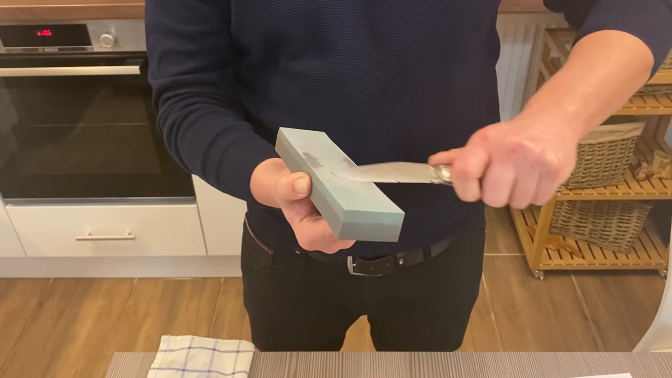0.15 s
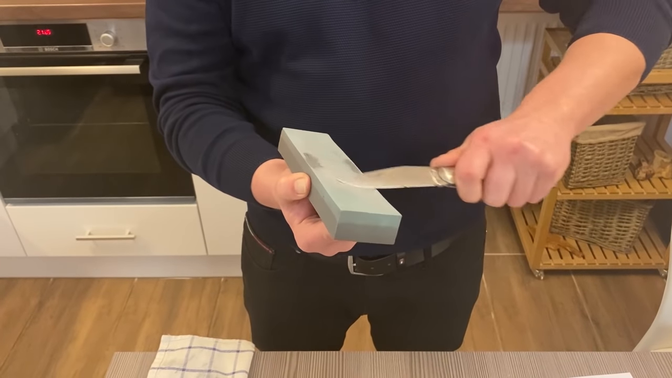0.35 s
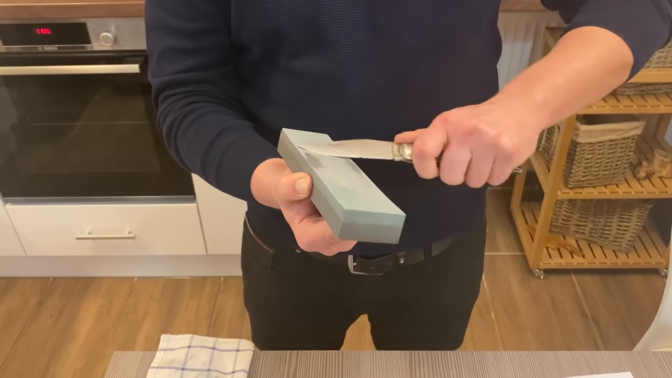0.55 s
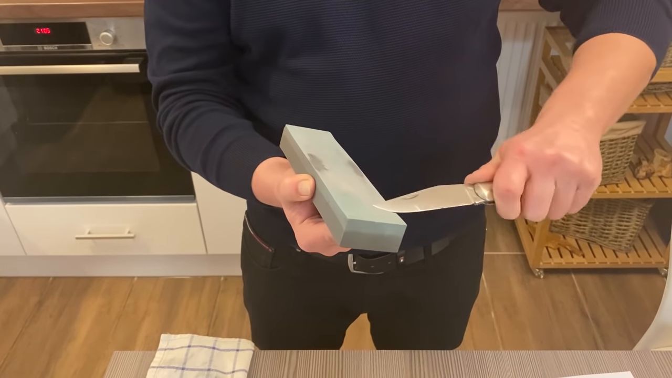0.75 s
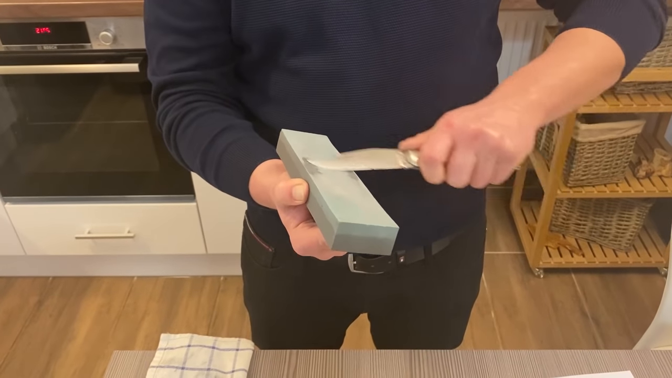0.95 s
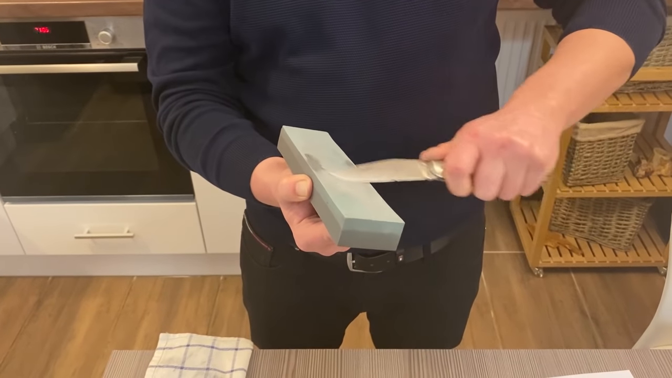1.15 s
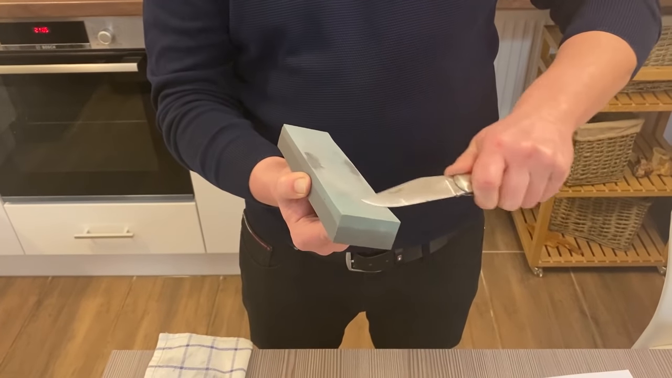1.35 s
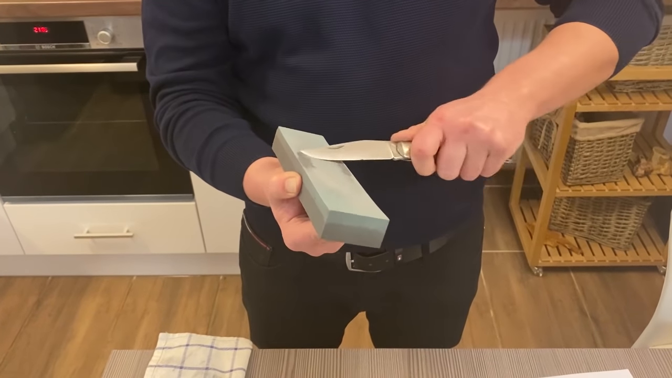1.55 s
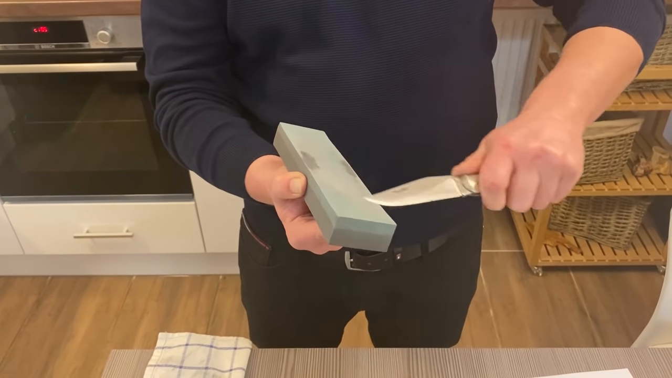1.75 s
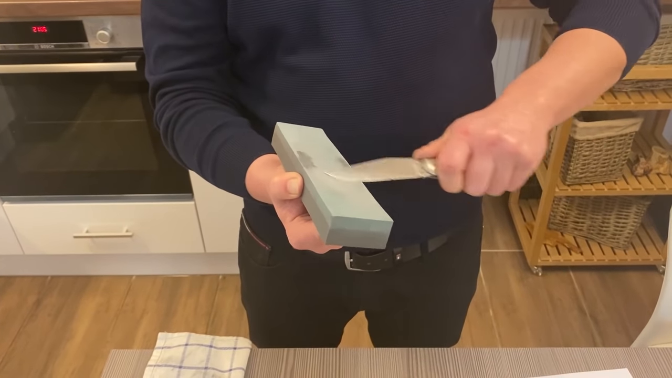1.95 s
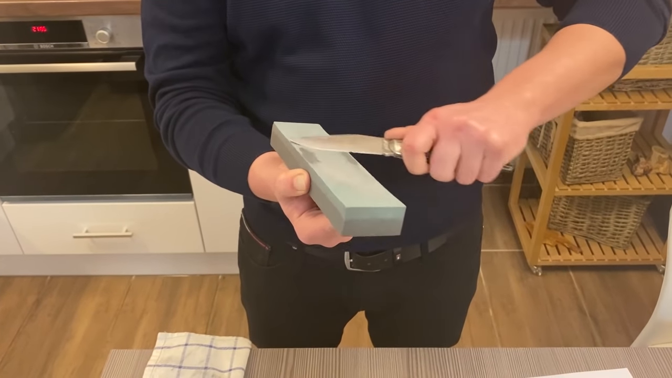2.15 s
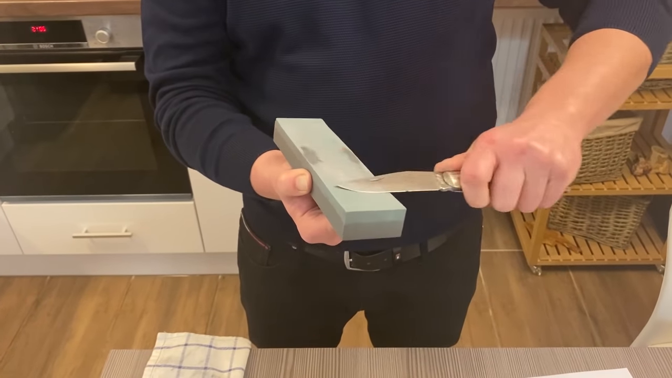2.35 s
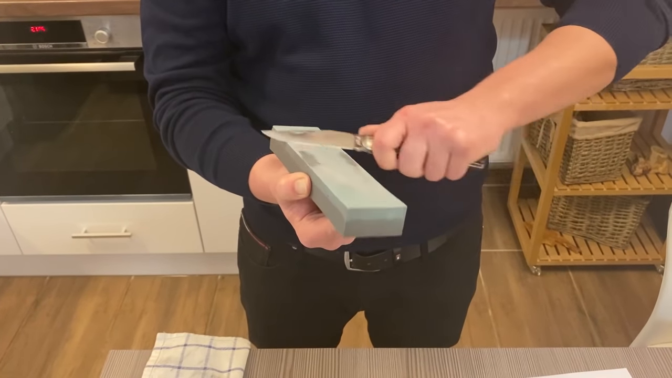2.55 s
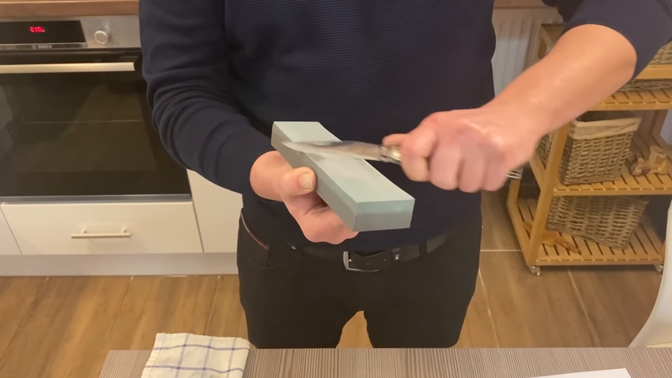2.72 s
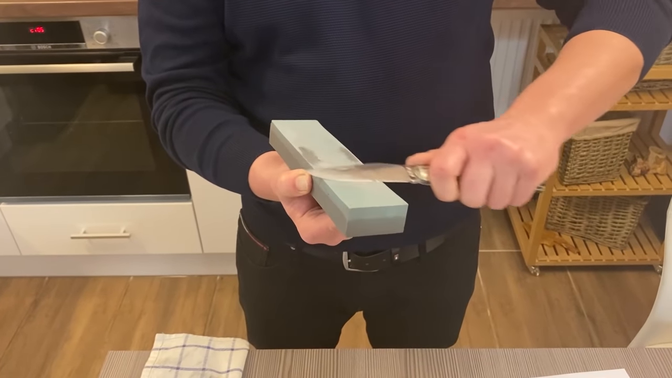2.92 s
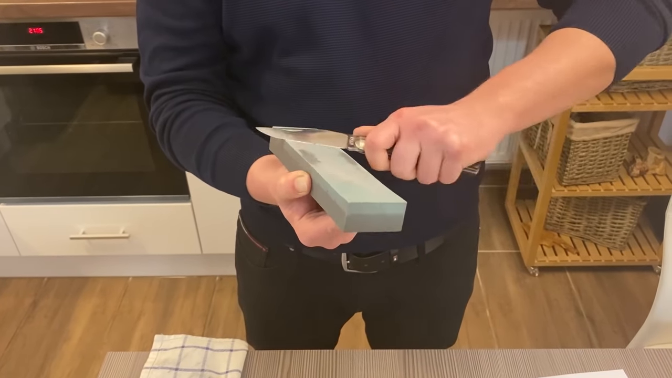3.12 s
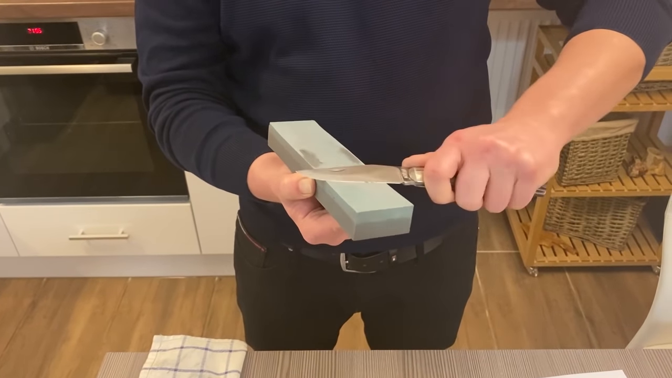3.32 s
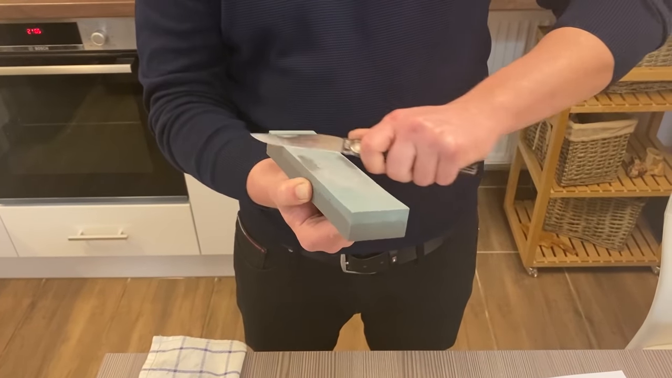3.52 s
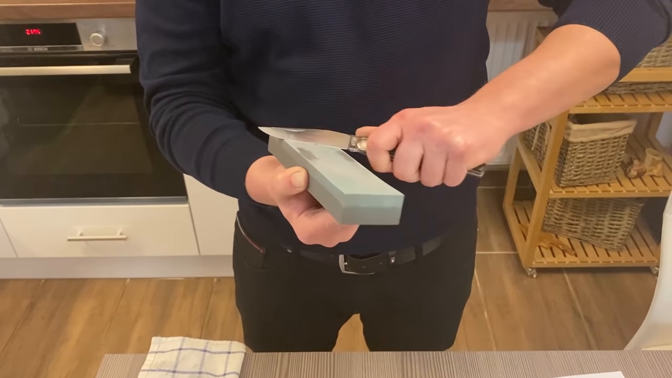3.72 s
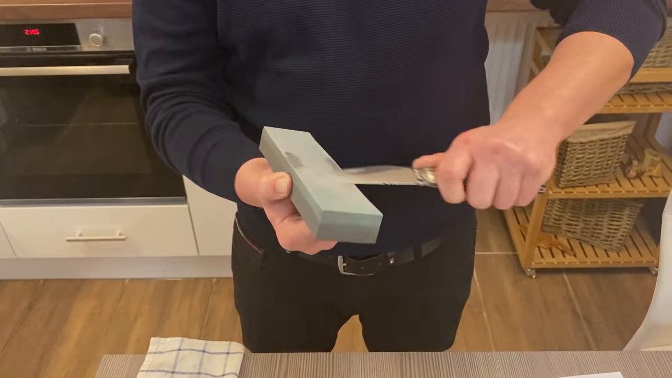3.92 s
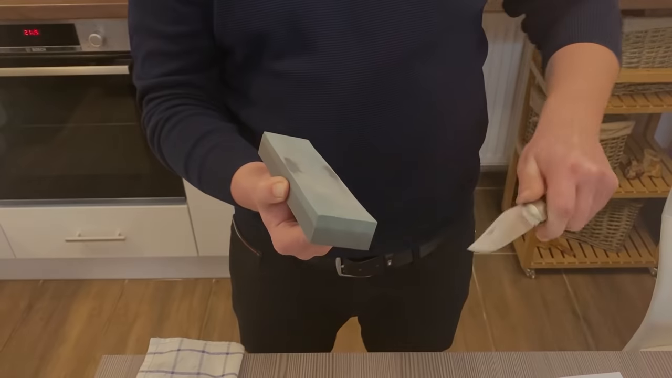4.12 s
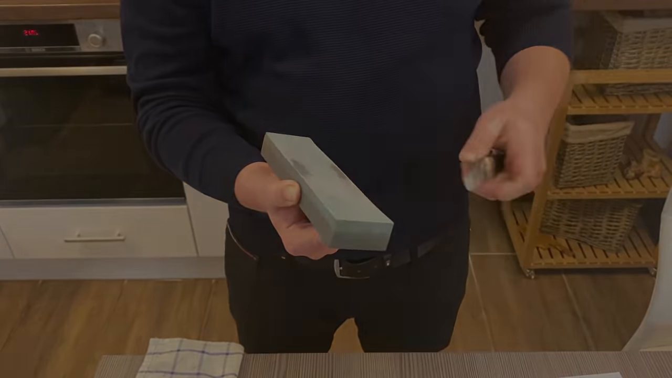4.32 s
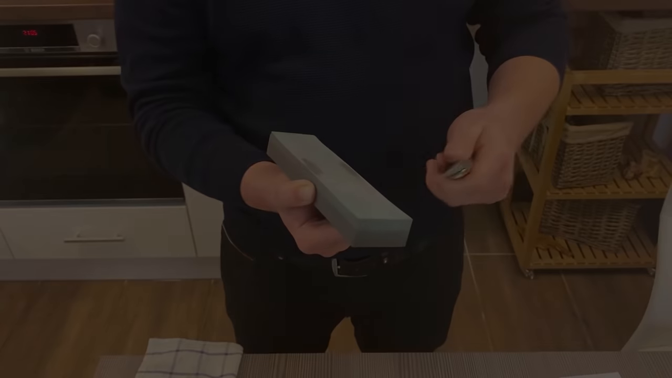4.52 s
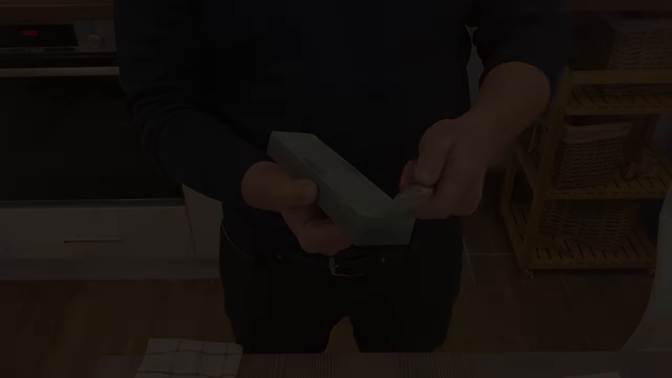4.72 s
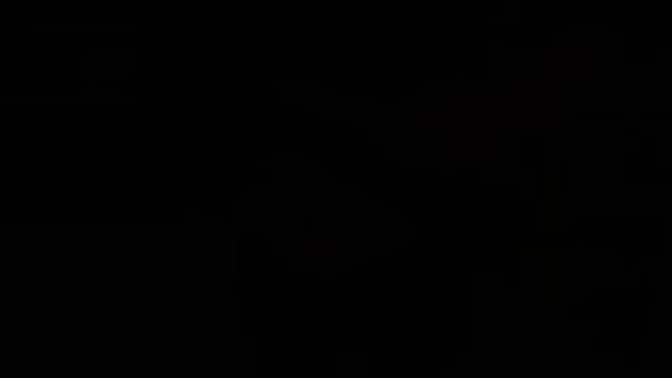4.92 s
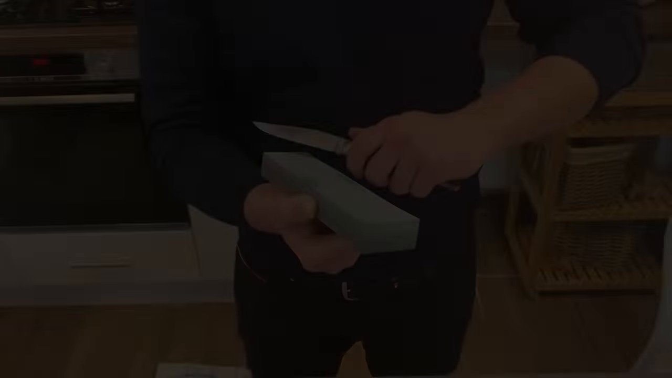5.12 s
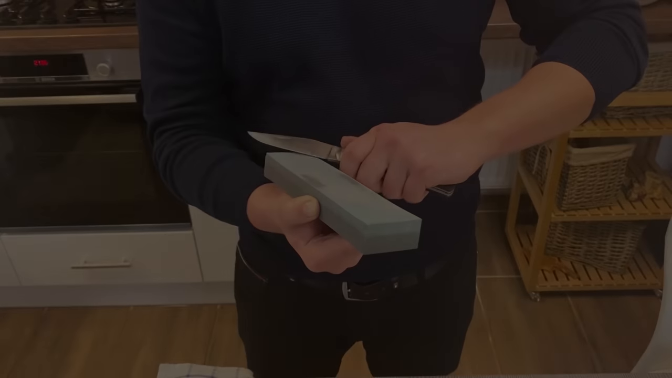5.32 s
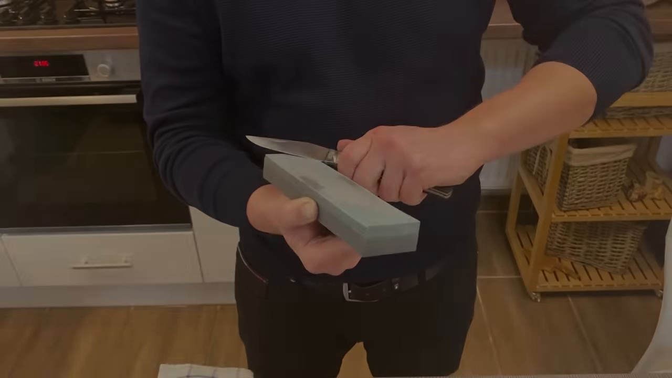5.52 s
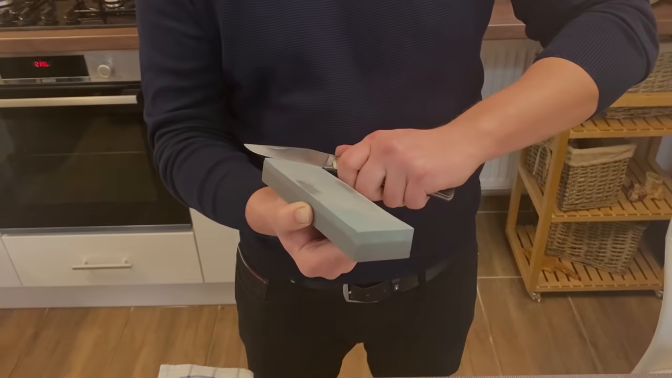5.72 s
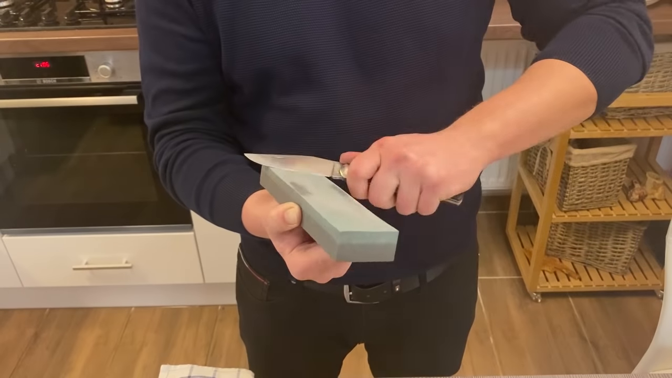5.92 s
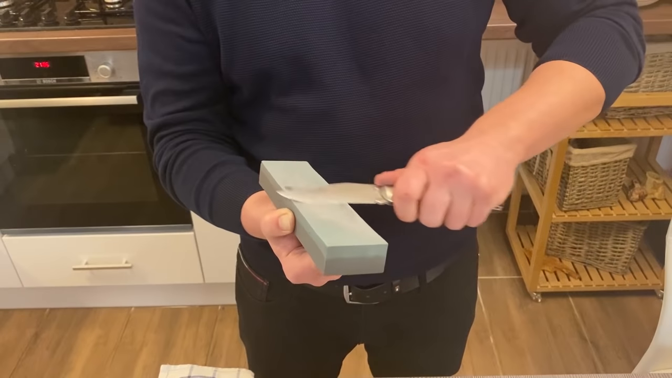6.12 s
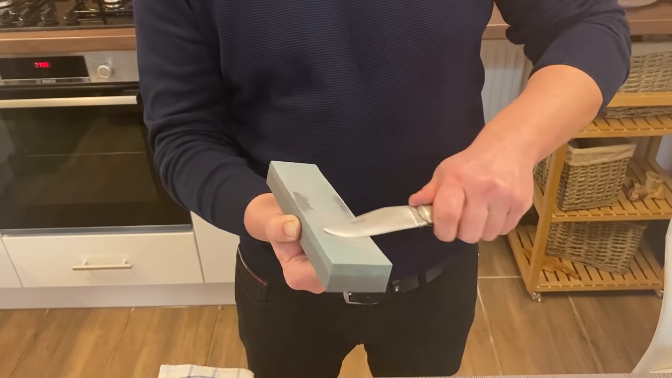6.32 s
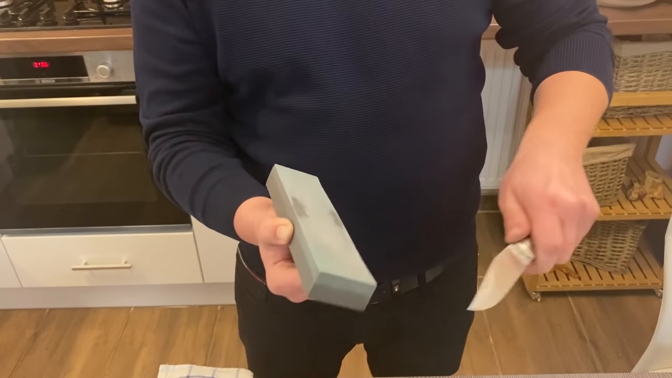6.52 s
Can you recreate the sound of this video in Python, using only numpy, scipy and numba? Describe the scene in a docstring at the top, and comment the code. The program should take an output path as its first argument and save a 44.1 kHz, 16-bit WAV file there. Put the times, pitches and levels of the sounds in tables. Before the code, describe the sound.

A small knife is sharpened on a dry handheld stone, close up in a kitchen with short, soft reflections. From 0 to about 3.6 s, quick strokes alternate back and forth roughly four times a second, each a sandy high hiss swelling and fading, with stony rasp and thin blade ringing. From about 2.4 s they grow brighter and hoarser, with brief sliding squeals. A slower sweep from 3.7 s strengthens near 4 s and ends with a light tap. A pause follows, with barely audible touches around 4.4 and 5 s. At 5.4 s the blade lands with a soft double clack, then small ticks until 5.7 s. One long uneven scrape builds from about 5.9 s, squealing near 6 to 6.15 s, peaking hard at 6.43 s and flicking off with a short ring. A very faint low appliance hum underneath rises slightly after 5 s.

```python
"""A small knife is whetted on a dry stone held in the hand: quick strokes drag its edge back and forth over the grit.
Random grain knocks are filtered into hiss, stone noise and blade rings; near the heel the edge chatters and squeals.
After a pause the blade is set down with light taps (short knocks and noise) and drawn off in a long, hard sweep.
Behind it, an appliance hum is made of noise and wavering tones; fading noise makes the kitchen's reflections."""
import sys
import numpy as np
from scipy import signal
from scipy.fft import rfft, irfft, next_fast_len
from scipy.io import wavfile
from scipy.ndimage import uniform_filter1d
from numba import njit

SR = 44100
rng = np.random.default_rng(int(sys.argv[2]) if len(sys.argv) > 2 else 0)


def store_wav(level_fs):
    """Save 16-bit WAV to argv[1]."""
    pcm = np.round(np.clip(np.atleast_2d(level_fs), -1, 1) * 32767)
    wavfile.write(sys.argv[1], SR, pcm.T.astype(np.int16))


N = 293706

# All levels in the tables are relative: the mix adds further gains.
# quick strokes, back and out in turn: [start_s, length_s, entry_speed (0-1), fastest_at (share of length, 0-1),
#   then at full speed: hiss_db, rasp_db, edge_resonance_hz, bending_pitch_hz, chatter_pitch_hz]
STROKES = [ (-0.2, 0.26, .6, 0.2, -37.5, -33.5, 8600, 1000, 5000),
           (0.062, 0.23, 0.45, 0.44, -34.5, -33, 8200, 1100, 5000),
           (0.363, 0.21, 0.85, 0.5, -39.5, -39.5, 8300, 1000, 4470),
           (0.580, 0.22, 0.64, 0.64, -34, -33, 8000, 1000, 4920),
           (0.857, .21, 0.86, 0.4, -33.5, -38.5, 8300, 920, 5060),
           (1.097, 0.22, 0.65, 0.55, -35, -35, 8300, 930, 4950),
           (1.377, 0.22, .6, .48, -34, -37.5, 8340, 950, 5070),
           (1.627, .21, 0.85, 0.61, -35, -37, 7920, 980, 5100),
           (1.896, 0.25, 0.59, .4, -33.5, -34.5, 8370, 1020, 4470),
           (2.158, 0.2, 0.47, 0.67, -32, -33, 8400, 1100, 3850),
           (2.405, .23, 0.35, 0.47, -30, -32.5, 10400, 1180, 5220),
           (2.668, 0.2, 0.45, 0.66, -29.5, -36, 10500, 1084, 5220),
           (2.912, 0.26, 0.4, 0.34, -33, -40, 10240, 1110, 5000),
           (3.178, .21, 0.52, 0.44, -34, -42, 8750, 1060, 4760),
           (3.398, 0.27, .55, 0.4, -34.5, -42.5, 8300, 1020, 4700), ]
# two slow sweeps off the stone:
#   [time_s, hiss_db, rasp_db, edge_resonance_hz, bending_pitch_hz, chatter_pitch_hz]
CLOSING_SWEEP = [(3.68, -38.5, -61.5, 9200, 962, 4980), (3.704, -41.5, -49.5, 8700, 953, 4960),
                 (3.792, -36.5, -41, 9700, 1110, 5280), (3.982, -31, -34.5, 8040, 1080, 5170),
                 (4.032, -40, -40.5, 10200, 1160, 5120), (4.07, -51, -48, 9650, 1220, 4970)]
LONG_SWEEP = [(5.65, -57, -55, 8920, 701.6, 4750), (5.932, -38.5, -39.5, 10400, 937.2, 5110),
              (5.972, -32, -39.5, 9870, 896.6, 5310), (6.02, -36.5, -36.5, 10240, 1054, 5340),
              (6.172, -29, -28.5, 9480, 1122, 5110), (6.242, -44.5, -39, 10270, 1162, 5210),
              (6.332, -28, -29.5, 10550, 1227, 5155), (6.374, -32, -32, 9850, 1101, 5236),
              (6.394, -29.5, -31.5, 9970, 1247, 5340), (6.428, -21.5, -22.5, 10400, 1117, 4810),
              (6.47, -46.5, -37.5, 10100, 1201, 4760)]
# where the stone supports the blade: [time_s, place (tip 0 to heel 1)]
SUPPORT = [(.1, 0.15), (1, 0.043), (2.05, 0.035), (2.2, 0.27), (2.5, 0.47), (2.78, 0.63), (3.3, 0.79),
           (3.84, 0.58), (3.97, .1), (5.0, 0.52), (5.36, 0.97), (5.6, 0.48), (6.06, 0.7), (6.35, .06)]
# spectrum of the hiss: [pitch_hz, level_db]
HISS_SPECTRUM = [(2500, -29.5), (4200, -7), (5800, -14.5), (7000, -8), (8300, 0.5), (9500, -3),
                 (10400, -0.5), (11200, -6), (12400, -2), (14000, -19), (16000, -3)]
# spectrum of the shaken stone: [pitch_hz, level_db]
STONE_SPECTRUM = [(150, -24), (400, -38), (700, -29.5), (1350, -18), (1700, 1), (2500, 2), (3020, -4.5),
                  (3500, -1.5), (4200, -3), (5600, -10.5), (9000, -13.5)]
# ringing modes of the blade, before damping: [pitch_hz, width_hz, tip_level_db, heel_level_db]
BLADE_MODES = [(1958, 43, 2.5, -11), (2176, 65, -4.5, -12.5), (2611, 54, 8.5, -12), (3338, 30, -9.5, 11.5),
               (3795, 160, -8, -2.5), (4640, 170, -21.5, -16.5), (5180, 140, -2, -11),
               (6030, 120, -20.5, -9), (6650, 150, -3, -16), (8060, 110, -12, 0), (10550, 50, 2.5, -6),
               (12560, 1200, -21.5, 5.5)]
# the edge bites near the heel and squeals: [start_s, length_s, level_db, first_pitch_hz, last_pitch_hz]
SQUEALS = [ (2.485, 0.073, -21, 5250, 5200), (2.55, .07, -34, 5280, 6000), (2.735, 0.088, -26, 5000, 6100),
           (2.945, 0.061, -29, 6700, 5340), (3.02, 0.11, -30.5, 5100, 5060),
           (3.275, 0.061, -27.5, 4950, 6600), (3.402, 0.066, -30, 6450, 5370),
           (3.525, 0.059, -29, 4600, 4950), (3.73, 0.12, -31, 5000, 5630), (5.985, .1, -24.5, 5320, 5300),
           (6.07, .085, -20, 5200, 5150), ]
# modes that sing under a light touch: [pitch_hz, level_db]
SINGING_MODES = [(3437., -2), (5161., -13.5)]
# the blade touches the stone or flicks off its end: [time_s, level_db, brightness_hz]
TAPS = [(4.035, -33.5, 8000), (4.441, -55.5, 2500), (4.971, -50, 2970), (4.992, -45.5, 8970),
        (5.366, -34, 3020), (5.4, -36, 3000), (5.536, -50.5, 10100), (5.586, -41.5, 9200),
        (5.652, -38, 8000), (5.706, -36, 8200), (6.425, -41, 7950)]
# modes of the heel's clack: [pitch_hz, width_hz, level_db]
CLACK_MODES = [(580, 170, -5), (1410, 56, 0.5), (3225, 120, 4)]
# spectrum of the appliance's noise: [pitch_hz, level_db]
HUM_SPECTRUM = [(20, -29), (45, -6), (90, 0.5), (150, 1), (260, -8), (450, -18.5), (700, -17.5),
                (1100, -25.5), (2400, -33), (7000, -37), (14000, -52)]
# wavering tones of the appliance: [pitch_hz, level_db]
HUM_TONES = [(100, -2.5), (133, -7), (158, -5.5)]
# how loud the hum is over time: [time_s, level_db]
HUM_LEVEL = [(0, -58), (4.9, -58), (5.3, -53), (6.6, -51.5)]
# the room's reflections relative to the direct sound: [pitch_hz, level_db]
ROOM_SPECTRUM = [(300, -3.5), (1100, -7), (2500, -3), (4000, -4), (7000, 0), (9000, -2.5), (15000, -11.5)]
# phase by which the left port leads the right: [pitch_hz, lead_radians]
PORT_PHASE = [(100, 2.5), (1100, 0.6), (1900, 1), (3000, 0.82), (5100, 2), (6000, 5), (8100, 4.5),
              (9400, 1.44), (10700, -0.2), (11300, 2), (13300, -10), (15500, -3)]
# left port minus right port: [pitch_hz, difference_db]
PORT_BALANCE = [(150, -4.5), (600, 1), (2100, -3.5), (3000, 0.5), (5500, 2), (7000, -1), (8200, -2.5),
                (10000, 0)]

HISS_FOLLOWS, RASP_FOLLOWS = 2.04, 2.01   # powers of the stroke's speed
BEND_SAG = .17   # share by which the bending pitch drops as the blade slows to rest
BACK_BEND_FALL = .16   # share by which it falls towards the end of a back stroke
# on a back stroke the edge first catches: louder hiss and a shifted resonance, then it settles
CATCH_DB, CATCH_HZ, CATCH_S = 2, 10700, 0.037
CHATTER_REST_HZ = 5250   # the chatter's pitch when the blade barely moves
GRIP_S = .012   # time in which the edge takes hold of the stone or lets go
SQUEAL_GLIDE = 1.1   # power of time: the pitch lingers, then slides
# the tip springs off the end of the stone and rings free
FLICK_S, FLICK_HZ, FLICK_DB, FLICK_T60_S = 6.428, 2640, -33, .3
ROOM_T60_LOW_S, ROOM_T60_HIGH_S = 0.34, 0.17   # time to fade by 60 dB, below and above 6 kHz
CUTOFF_HZ = 16000


def stroke(back, s, length, entry, crest, hiss_db, rasp_db, edge_hz, bend_hz, chatter_hz, count=40):
    """The hand speeds up and slows to rest; levels and pitches follow its speed. Gives rows as for a sweep."""
    along = np.linspace(0, 1, count, endpoint=False)
    swing = np.interp(along, [0, crest, 1], [np.arcsin(entry), np.pi / 2, np.pi])
    speed = np.sin(swing)
    speed_db = 20 * np.log10(speed)
    catch = back * np.exp(-along * length / CATCH_S)
    return np.column_stack([
        s + along * length,
        hiss_db + HISS_FOLLOWS * speed_db + CATCH_DB * catch,
        rasp_db + RASP_FOLLOWS * speed_db,
        edge_hz + (CATCH_HZ - edge_hz) * catch,
        bend_hz * (1 - BEND_SAG * (1 - speed) - back * BACK_BEND_FALL * along ** 2),
        CHATTER_REST_HZ + (chatter_hz - CHATTER_REST_HZ) * speed ** 2])


def motion():
    """Gains of hiss and rasp, zero while the blade turns round, then the edge, bending and chatter pitches."""
    passes = [stroke(k % 2 == 0, *row) for k, row in enumerate(STROKES)]
    passes += [np.array(CLOSING_SWEEP), np.array(LONG_SWEEP)]
    t, gains = np.arange(N) / SR, np.zeros((2, N))
    for s, hiss_db, rasp_db, *_ in map(np.transpose, passes):
        moving = (t >= s[0]) & (t < s[-1])
        gains[:, moving] = [from_db(np.interp(t[moving], s, db)) for db in (hiss_db, rasp_db)]
    _, _, *pitches = in_time(sorted(np.vstack(passes).tolist()))
    hiss_gain, rasp_gain = uniform_filter1d(gains, int(GRIP_S * SR))
    return hiss_gain, rasp_gain, *pitches


def grit(slips, per_s=16000, size_db=2.0):
    """The edge knocks over grains of uneven size, in clumps as it sticks and slips; rms 1."""
    sizes = from_db(size_db * np.minimum(rng.exponential(1, N), 5)) * rng.choice([-1, 1], N)
    knocks = rng.random(N) < per_s / SR
    return rms_one(sizes * knocks * slips)


def edge_hiss(slips, edge_hz, hiss_db=3.0, edge_db=-4.0, chip_db=-17.5):
    """Crumbling grit hisses, with a resonance that moves with the point of contact; coarse grains tick."""
    waver = 1 + .012 * drift(25)
    ring = resonance(grit(slips), edge_hz * waver, width_hz=440, skirt_hz=2500)
    coarse = grit(slips, per_s=290)
    grains = grit(slips) + from_db(chip_db) * coarse
    hiss = rms_one(patchy(colour(grains, HISS_SPECTRUM)))
    return from_db(hiss_db) * hiss + from_db(edge_db) * ring


def patchy(x, patch_db=7.0, patch_rate=9, count=11):
    """The stone's uneven face favours now one part of the treble, now another."""
    out, rest = np.zeros(N), x
    # peel off one band after another, from low to high
    for hz in np.linspace(3500, 14500, count):
        band = signal.sosfiltfilt(signal.butter(6, hz, fs=SR, output="sos"), rest)
        out = out + band * from_db(patch_db * drift(patch_rate))
        rest = rest - band
    return out + rest


def rasp(slips, push, bend_hz, blade_db=11.0, stone_db=-4.5, bend_tip_db=-27.5, bend_heel_db=2.5,
         second_db=-2.5, third_db=-10.0, rumble_db=-13.0):
    """The grains shake the stone, ring the blade and bend it, most when it overhangs the stone."""
    heel, = in_time(SUPPORT)
    grains = grit(slips)
    first = resonance(grains, bend_hz, width_hz=76, skirt_hz=595)
    second = resonance(grains, bend_hz * 1.52, width_hz=61, skirt_hz=713)
    third = resonance(grains, bend_hz * 2.17, width_hz=67, skirt_hz=900)
    # the two lowest bending modes need the heel; the third sounds all along the edge
    heel_gain = from_db(bend_tip_db + (bend_heel_db - bend_tip_db) * heel)
    bending = heel_gain * (first + from_db(second_db) * second) + from_db(third_db) * third
    stone = from_db(stone_db) * rms_one(colour(grit(slips), STONE_SPECTRUM))
    # the hand-held stone rumbles when the heel presses on it
    rumble = from_db(rumble_db) * heel ** 2 * resonance(grains, np.full(N, 640.), width_hz=201, skirt_hz=700)
    return push * (bending + stone + rumble) + from_db(blade_db) * blade(push * grit(slips))


def blade(force, damping=1):
    """The blade's modes ring side by side; the place of contact decides how strongly each is driven."""
    heel, = in_time(SUPPORT)
    out = np.zeros(N)
    for hz, width, tip_db, heel_db in BLADE_MODES:
        r = np.exp(-np.pi * width * damping / SR)
        poles = [1, -2 * r * np.cos(2 * np.pi * hz / SR), r * r]
        zeros = [(1 - r * r) / 2, 0, (r * r - 1) / 2]
        wander_db = 2.2 * drift(9)
        drive = force * from_db(tip_db + (heel_db - tip_db) * heel + wander_db)
        out += signal.lfilter(zeros, poles, drive + 1e-18)   # the tiny offset keeps silence quick to compute
    return out


def chatter(slips, hz, burst_db=4.0):
    """The edge judders in short bursts, a hoarse tone; rms 1."""
    tone = resonance(grit(slips), hz * (1 + 0.02 * drift(45)), width_hz=330, skirt_hz=2250)
    return rms_one(tone * from_db(burst_db * drift(87)))


def squeals(slips):
    """Where the edge bites, the chatter swells to a squeal that slides in pitch and dies."""
    t, gain = np.arange(N) / SR, np.zeros(N)
    pitch = np.full(N, float(SQUEALS[0][3]))
    for s, length, db, first_hz, last_hz in SQUEALS:
        along = np.clip((t - s) / length, 0, 1)
        gain += from_db(db) * np.sqrt(4 * along * (1 - along))
        pitch = np.where(t >= s, first_hz + (last_hz - first_hz) * along ** SQUEAL_GLIDE, pitch)
    return gain * chatter(slips, pitch)


def free_ring(slips, push, ring_db=-8.0, grip=0.74):
    """A lightly pressed blade is less damped: two sharp modes sing on through the ends of each stroke."""
    ring = 0
    for hz, db in SINGING_MODES:
        swell = from_db(3 * drift(7))
        tone = resonance(grit(slips), np.full(N, hz), width_hz=22, skirt_hz=297)
        ring = ring + from_db(db) * rms_one(swell * tone)
    loudest = push.max()
    # a power below 1 lifts the quiet ends of the strokes
    level = loudest * (np.maximum(push, 0) / loudest) ** grip
    return from_db(ring_db) * level * ring


def taps(tap_db=10.0, crunch_s=0.031, crunch_db=0.0):
    """Each touch knocks and crushes a few grains; so light a contact lets the blade ring on."""
    force, t = np.zeros(N), np.arange(SR // 10) / SR
    for s, db, bright_hz in TAPS:
        at = round(s * SR)
        touch = from_db(crunch_db) * np.exp(-t / crunch_s) * rng.standard_normal(len(t))
        touch[0] += 6   # the knock itself
        softened = signal.lfilter(*signal.butter(1, bright_hz, fs=SR), touch)
        force[at:at + len(t)] += from_db(db + tap_db) * softened
    return blade(force, damping=.8) + clack(force) + from_db(-20) * force


def clack(force, clack_db=-2.5):
    """Set down on its heel, the stiff part of the knife gives a short clack."""
    stiff = force * in_time(SUPPORT)[0] ** 2 + 1e-18
    out = np.zeros(N)
    for hz, width, db in CLACK_MODES:
        out += from_db(db + clack_db) * signal.lfilter(*signal.iirpeak(hz, hz / width, fs=SR), stiff)
    return out


def flick(slips):
    """Let go by the stone, the tip rings out roughly around one mode."""
    t = np.arange(N) / SR - FLICK_S
    ring = resonance(grit(slips), np.full(N, float(FLICK_HZ)), width_hz=37, skirt_hz=500)
    return (t > 0) * from_db(FLICK_DB - 60 * np.abs(t) / FLICK_T60_S) * ring


def ports(x):
    """The two ports hear the blade with a phase difference that changes with pitch."""
    size = next_fast_len(N + SR // 10)
    # each port takes half of the phase lead, in opposite directions
    turn = np.exp(.5j * per_bin(PORT_PHASE, size=size) * np.array([[1], [-1]]))
    return irfft(rfft(x, size) * turn, size)[:, :N]


def kitchen(x, first_echo_s=0.0016):
    """Diffuse reflections, unrelated at the two ports; the treble dies sooner."""
    t = np.arange(SR * 3 // 4) / SR
    white = rng.standard_normal((2, len(t)))
    low = signal.sosfilt(signal.butter(2, 6000, fs=SR, output="sos"), white)
    high = signal.sosfilt(signal.butter(2, 6000, "high", fs=SR, output="sos"), white)
    tail = low * from_db(-60 * t / ROOM_T60_LOW_S) - high * from_db(-60 * t / ROOM_T60_HIGH_S)
    tail = tail * (t > first_echo_s)
    tail = tail / np.sqrt(np.sum(tail ** 2, axis=1, keepdims=True))
    return signal.fftconvolve(colour(x, ROOM_SPECTRUM)[None], tail, axes=1)[:, :N]


def hum(noise_db=-1.5, side_db=-4.5):
    """An appliance drones behind the room's faint hiss: wavering tones over shaped noise."""
    level_db, = in_time(HUM_LEVEL)
    mid, side = rms_one(colour(rng.standard_normal((2, N)), HUM_SPECTRUM))
    noise = mid + from_db(side_db) * side * [[1], [-1]]   # side has opposite signs left and right
    t, tones = np.arange(N) / SR, np.zeros(N)
    for hz, db in HUM_TONES:
        tones += from_db(db) * np.sin(2 * np.pi * hz * t + 3.4 * drift(1.8))
    return from_db(level_db) * (from_db(noise_db) * noise + tones)


def from_db(db):
    """Decibels to gain."""
    return 10 ** (np.asarray(db) / 20)


def rms_one(x):
    """Scale to rms 1."""
    return x / np.sqrt(np.mean(x ** 2) + 1e-20)


def in_time(rows):
    """Each column of a curve at every sample."""
    s, *columns = np.transpose(rows)
    return [np.interp(np.arange(N) / SR, s, c) for c in columns]


def per_bin(points, size=N):
    """A table over log frequency, read at every FFT bin."""
    hz, value = np.transpose(points)
    return np.interp(np.log(np.fft.rfftfreq(size, 1 / SR) + 1), np.log(hz), value)


def colour(x, spectrum):
    """Give a sound a smooth spectrum."""
    size = next_fast_len(N + SR // 10)
    return irfft(rfft(x, size) * from_db(per_bin(spectrum, size=size)), size)[..., :N]


def drift(rate, size=N):
    """Slow random wandering of rms 1, drawn at every 20th sample; a higher rate (Hz) wanders faster."""
    r = np.exp(-2 * np.pi * rate * 20 / SR)
    noise = rng.standard_normal(size // 20 + 2002)
    slow = signal.lfilter([1], [1, -2 * r, r * r], noise)[2000:]   # skip the filter's start
    return np.interp(np.arange(size) / 20, np.arange(len(slow)), rms_one(slow))


@njit
def glide(x, w, r):
    """A resonance whose pitch w (radians per sample) moves; r is what is left of the ring after one sample."""
    out, state = np.zeros(len(x)), 0j
    for i in range(len(x)):
        state = state * r * complex(np.cos(w[i]), np.sin(w[i])) + x[i]
        out[i] = state.real
    return out


def resonance(x, hz, width_hz, skirt_hz):
    """A narrow and a wide moving resonance in a row give steep skirts; rms 1."""
    w = 2 * np.pi * hz / SR
    narrow = glide(x, w, np.exp(-np.pi * width_hz / SR))
    return rms_one(glide(narrow, w, np.exp(-np.pi * skirt_hz / SR)))


def scene(slip_db=1.03, wobble_db=1.19, knife_db=-2.5, chatter_tip_db=-5.0, chatter_heel_db=4.0, squeal_db=0.0):
    """One unsteady contact drives every part of the scrape; taps, room and hum are added."""
    slips = from_db(slip_db * drift(270) + wobble_db * drift(34))
    cut, push, edge_hz, bend_hz, chatter_hz = motion()
    heel, = in_time(SUPPORT)
    # the chatter is stronger towards the heel
    chatter_gain = from_db(chatter_tip_db + (chatter_heel_db - chatter_tip_db) * heel)
    judder = chatter_gain * chatter(slips, chatter_hz)
    knife = cut * (edge_hiss(slips, edge_hz) + judder)
    knife = knife + from_db(squeal_db) * squeals(slips)
    knife = knife + rasp(slips, push, bend_hz) + free_ring(slips, push)
    knife = knife + taps() + flick(slips)
    return from_db(knife_db) * (ports(knife) + kitchen(knife)) + hum()


def record(dry):
    """Each port has its own colour; the top is cut."""
    sides = []
    for x, sign in zip(dry, (1, -1)):
        sides.append(colour(x, [(hz, sign * db / 2) for hz, db in PORT_BALANCE]))
    return signal.sosfilt(signal.ellip(10, .2, 80, CUTOFF_HZ, fs=SR, output="sos"), sides)


dry = scene()
out = record(dry)
store_wav(out)
```